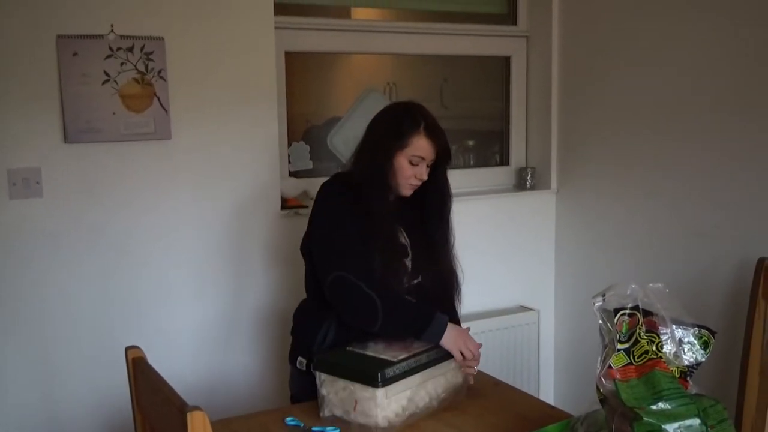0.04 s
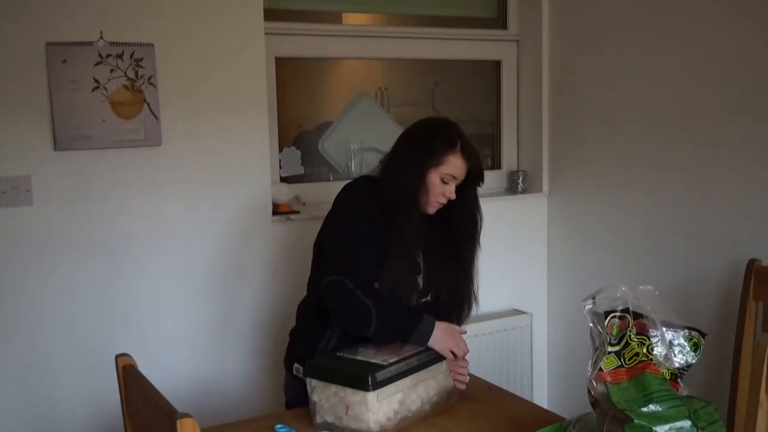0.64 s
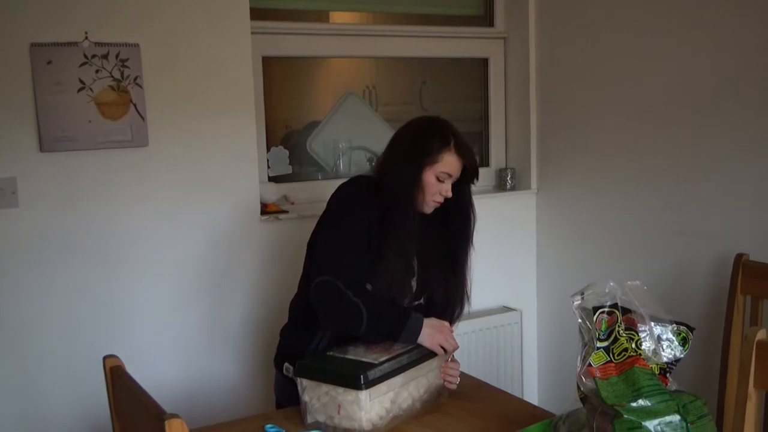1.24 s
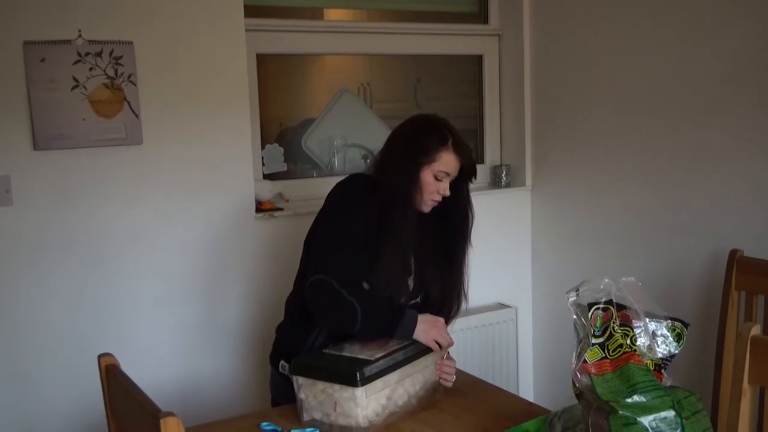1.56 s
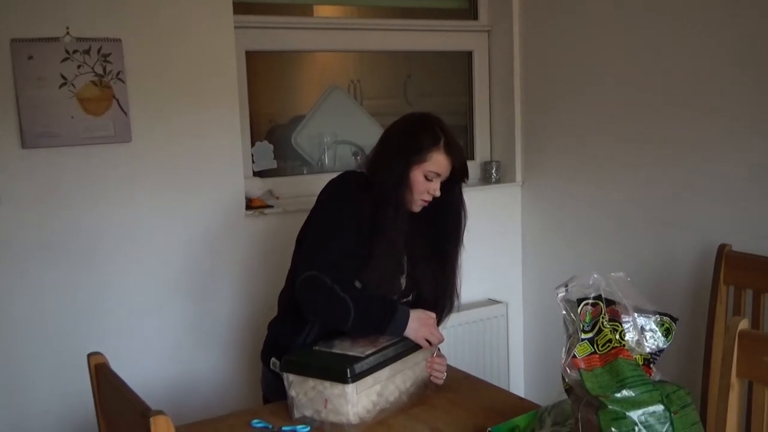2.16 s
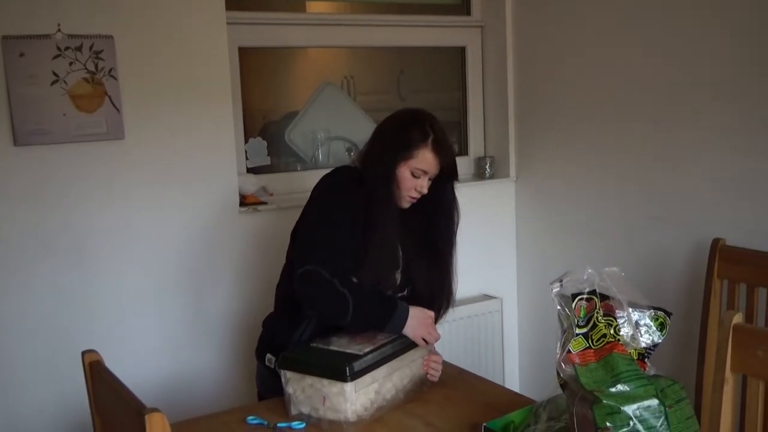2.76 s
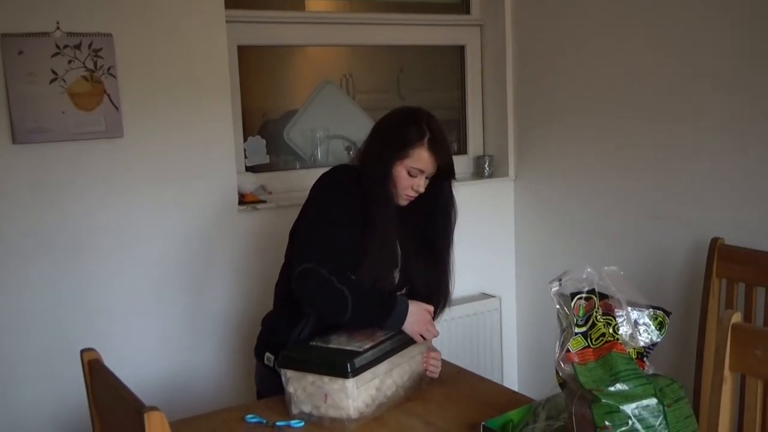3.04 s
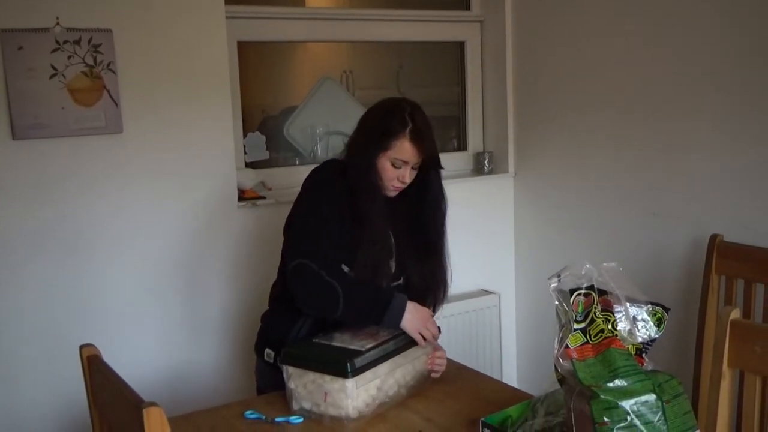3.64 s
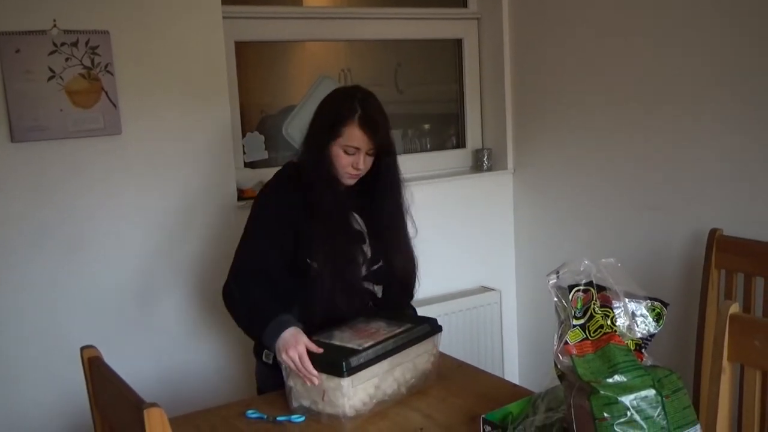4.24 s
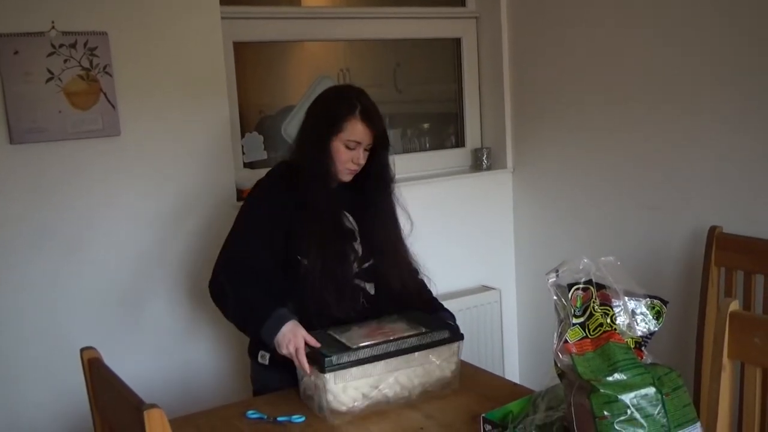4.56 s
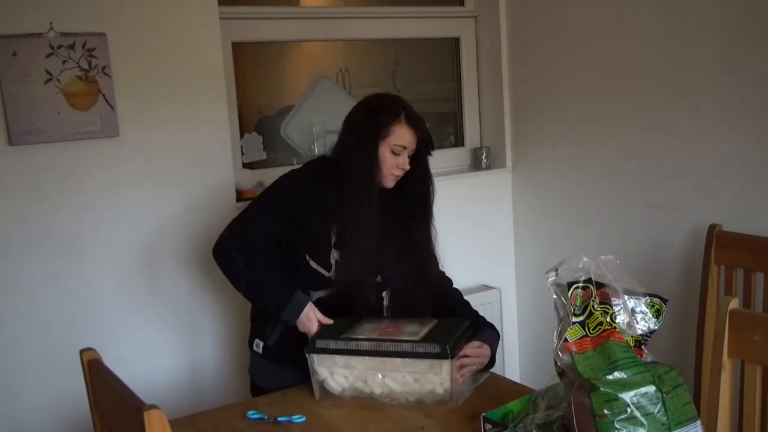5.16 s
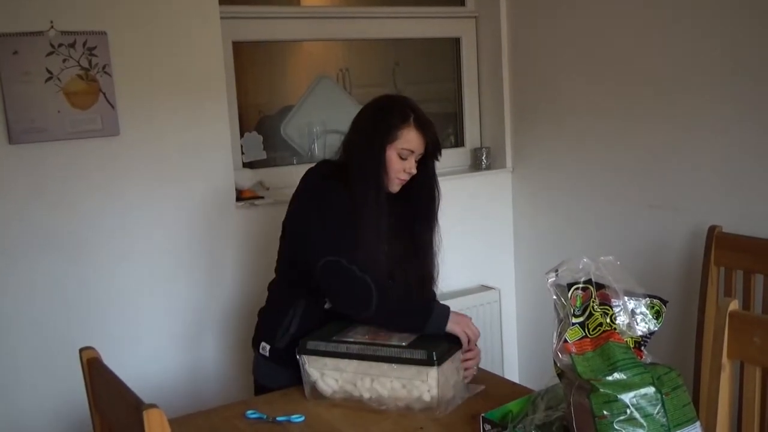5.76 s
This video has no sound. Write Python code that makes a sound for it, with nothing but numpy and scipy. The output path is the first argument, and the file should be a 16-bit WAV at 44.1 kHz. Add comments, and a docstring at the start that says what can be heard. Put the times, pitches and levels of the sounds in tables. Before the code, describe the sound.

In a small, quiet room, hands press on the lid of a plastic box filled with foam packing peanuts. The lid slips with light, sharp ticks and creaks, and the box bumps softly on a wooden table. It is then dragged round, scraping and juddering while the peanuts rustle inside. A few more ticks lead to a loud snap as the lid shuts. The walls add a brief echo, over a low hush and a faint whirr.

```python
"""A clear plastic box full of foam packing peanuts is handled on a wooden table in a small dining room.
Hands press the lid down: it slips on the rim with ticks and creaks, and the box bumps the table.
The box is then dragged round: its plastic scrapes, its base judders and the peanuts rustle inside.
At last the catch slips and the lid snaps shut, ringing the lid and the hollow box.
The walls echo briefly. Behind it all are a tiny mechanism's faint whirr and the room's low hush."""
import sys
import numpy as np
from scipy import signal
from scipy.fft import rfft, irfft, next_fast_len
from scipy.io import wavfile

SR = 44100
rng = np.random.default_rng(int(sys.argv[2]) if len(sys.argv) > 2 else 0)


def materialize(psi):
    """Save the field psi as 16-bit PCM at rate SR to the path in sys.argv[1].

    A 1-D psi becomes a single channel; in a 2-D psi each row is a channel.
    """
    bounded = np.clip(np.atleast_2d(psi).T, -1, 1)
    quanta = np.round(bounded * 32767).astype(np.int16)
    wavfile.write(sys.argv[1], SR, quanta)


N = 256088

# the lid slipping on the rim: start_s, level_db, pitch_hz, echo_db (compared with the tick)
LID_SLIPS = [(0.0259, -11, 10200, 3), (0.07, -19, 8900, -5), (0.0735, -12.5, 8750, -3),
             (0.164, -26, 9600, -1), (0.3072, -18.5, 9900, 1), (0.517, -20, 9150, 8), (0.715, -34, 7000, 6),
             (0.909, -32, 1190, -13), (1.086, -32.5, 9100, -1), (1.255, -26, 8800, 2.5),
             (1.5859, -25, 9150, 3), (1.7882, -23.5, 9900, 4), (1.818, -33.5, 5700, -6),
             (1.845, -37, 1290, 0.5), (1.9418, -40, 5000, 5), (2.102, -30, 5370, 2), (2.354, -25, 8600, -7),
             (2.554, -30, 9700, 1), (2.795, -40.5, 2430, 2.5), (3.362, -27.5, 7500, 2),
             (3.3703, -33.5, 10300, 12), (3.425, -27.5, 8750, -4), (3.456, -16.5, 9800, 1),
             (3.456, -27, 1340, -1), (3.4932, -15.5, 8100, 2.5), (3.9283, -23, 4530, -1),
             (4.1272, -12.5, 9800, -13), (4.214, -30, 4330, 7), (4.3915, -18.5, 3250, -1),
             (5.163, -15, 9800, -6), (5.306, -18, 5440, 3.5), (5.508, -25, 1460, 2),
             (5.554, -16, 7800, 8.5), (5.58, -14.5, 9000, -4)]
# the catch slips, then the lid slams home: start_s, click_db, lid_hit_db
SNAP_HITS = [(5.7391, -5.5, -45), (5.7395, -19, -24), (5.7412, -1, -31), (5.7426, -6.5, -18.5)]
# notes of the stiff lid: pitch_hz, level_db, ring_s (time to fade by 60 dB)
LID_NOTES = [(772, 0.5, 0.18), (1057, 1.5, 0.026), (1225, 0.5, 0.074), (1317, -4, 0.15), (1520, -30, 0.067),
             (1660, 11, 0.019), (1828, 4.5, 0.13), (1850, -2, 0.035), (2130, 3, 0.066), (2468, 5.5, 0.097),
             (2550, -2, 0.081), (2820, -7.5, 0.053), (3335, 7.5, 0.045), (7590, -2, 0.076),
             (8290, -16, .06), (9200, -16, .08), (9340, -4, 0.15)]
# pushes that shift the box: full_force_s, hold_s, rustle_db, scrape_db
BOX_PUSHES = [(0.0, 0.045, -33, -33), (0.245, .015, -48.5, -46.5), (0.314, 0.05, -71, -44.5),
              (0.57, 0.035, -51, -48), (0.715, 0.054, -57.5, -51.5), (0.96, 0.03, -61, -66),
              (1.09, 0.11, -70, -55.5), (1.38, 0.021, -67, -55.5), (2.36, 0.0088, -52, -41.5),
              (2.79, 0.097, -63.5, -64), (3.245, 0.0069, -55, -50.5), (3.383, .17, -48.5, -47.5),
              (3.844, 0.14, -50, -57.5), (3.96, 0.058, -43.5, -46), (4.08, 0.16, -46, -52.5),
              (4.225, 0.11, -45.5, -44), (4.345, 0.051, -37, -58), (5.502, 0.026, -35, -42.5),
              (5.583, 0.01, -39.5, -37), (5.713, 0.09, -35, -43)]
# drags across the table: full_speed_s, hold_s, rustle_db, scrape_db, judder_db
BOX_DRAGS = [(4.391, 0.14, -40.5, -39.5, -35), (4.925, 0.21, -35.5, -37.5, -38.5)]
# tone of peanuts rubbing together: pitch_hz, level_db
RUSTLE_TONE = [(2000, -14), (4000, -9.5), (6300, -10), (8000, -6.5), (9600, -3.5), (11500, -11),
               (13500, -20), (16000, -32)]
# tone of single peanuts slipping on the box wall: pitch_hz, level_db
CRACKLE_TONE = [(3000, -28), (7000, -11), (9500, -2), (12000, -1), (13500, -14), (16000, -30)]
# tone of scraping plastic: pitch_hz, level_db
SCRAPE_TONE = [(50, -5), (110, -15.5), (180, -8), (280, 4), (420, -5), (700, 1), (860, -2), (1100, -0.5),
               (1700, -2.5), (2500, -5), (4500, -8.5), (7000, -11.5), (14000, -25.5)]
# tone of the base juddering on the table: pitch_hz, level_db
JUDDER_TONE = [(40, -36), (80, -20.5), (130, -18.5), (175, -8.5), (225, -10), (268, 3.5), (325, -1),
               (370, -12.5), (530, -5.5), (750, -20), (1200, -28), (3000, -61)]
# the box bumping the table: start_s, box_hit_db, table_hit_db, top_hz (lower is softer)
TABLE_BUMPS = [(2.102, -45, -77, 400), (2.3634, -17.5, -52, 795), (3.2653, -25.5, -58.5, 587),
               (4.208, -19, -45, 657), (4.264, -25, -57, 400), (4.447, -41, -77, 606),
               (5.199, -25, -46.5, 350)]
# notes of the hollow box: pitch_hz, level_db, ring_s
BOX_NOTES = [(261.6, -4.5, 0.19), (324, -8.5, 0.08), (323, -7, 0.13), (364, -3, 0.036), (405, -11.5, 0.14),
             (428, -10.5, 0.14), (486, -25, 0.49), (535, -12, 0.2), (568, -15, 0.051), (637, -17.5, 0.14),
             (727, -9.5, 0.075), (736, -15, 0.045), (972, -14, 0.06), (1120, -15, 0.07)]
# notes of the table top: pitch_hz, level_db, ring_s
TABLE_NOTES = [(67.7, -2, 0.25), (86.5, -18, 0.16), (117, 5.5, 0.086), (177, 4.5, 0.27)]
# echo off the walls: pitch_hz, ring_s, level_db
ROOM_ECHO = [(100, 0.27, 9), (278, 0.43, 3), (577, 0.31, 5.5), (1480, 0.75, 4), (3770, 0.49, 2),
             (8950, 0.28, -5), (15000, 0.11, -8.5)]
# tone of the quiet room: pitch_hz, level_db
HUSH_TONE = [(25, 6.5), (40, -1), (60, 7.5), (80, -2), (100, 4), (125, -3), (170, 0.5), (260, -4.5),
             (440, -8), (700, -6), (1400, -17), (2500, -19.5), (5000, -32), (10000, -23), (15000, -29.5)]
# stereo width given to the rustle, scrape, judder, echo and hush; the highest treble is almost mono:
# pitch_hz, side_db (compared with the middle)
STEREO_WIDTH = [(60, -28), (250, -22), (500, -13), (1000, -9.5), (2500, -7), (5000, -7.5), (8000, -9),
                (12000, -33)]


def lid_ticks(lid_db=-50, creak_at_1khz_s=0.0085):
    """Each slip of the lid ticks and faintly rings it; low slips creak for longer."""
    direct, to_room, hits = np.zeros((3, N))
    for start_s, db, hz, echo_db in LID_SLIPS + faint_slips():
        creak_s = creak_at_1khz_s / (hz / 1000) ** 0.57
        tick = from_db(db) * click(hz, creak_s)
        add(direct, start_s, tick)
        # chatter evens out over all directions, so the room gets a smooth click of equal energy
        smooth = tick.std() * rms_one(click(hz, creak_s, chatter=0))
        add(to_room, start_s, from_db(echo_db) * smooth)
        add(hits, start_s, from_db(db + lid_db) * impulse())
    return direct + room(to_room + ring(hits, LID_NOTES))


def faint_slips(per_s=6, press_s=3.05, db=-40.5, spread_db=2, low_hz=1290, high_hz=5900, echo_db=-2):
    """Small random slips while the hands press, as rows like those of LID_SLIPS."""
    draws = rng.random((int(per_s * press_s), 3))
    return [(when * press_s, db + spread_db * (2 * size - 1), low_hz * (high_hz / low_hz) ** pitch, echo_db)
            for when, size, pitch in draws]


def click(hz, creak_s, damping=0.22, least_width_hz=900, broad_db=-18, chatter=0.12):
    """Hard plastic slips once, then chatters as it settles; the peak is near 1."""
    def plastic(force):
        """The plastic gives a bright peak and a weaker, lower one."""
        bright = resonance(force, hz, damping * hz + least_width_hz)
        broad = from_db(broad_db) * resonance(force, 0.27 * hz, hz)
        return keep_band(bright + broad, 4, 12500, "low")

    slip = impulse(size=4096)
    fade = np.exp(-np.arange(len(slip)) / (creak_s * SR))
    creak = chatter * rng.standard_normal(len(slip)) * fade
    return plastic(slip + creak) / np.abs(plastic(impulse())).max()


def lid_snap(catch_hz=8700, box_db=-13, ring_db=-8, crack_db=-9, echo_db=-3):
    """The catch lets go in a burst of clicks; the lid cracks, rings and shakes the box."""
    clicks, hits, crack = np.zeros((3, N))
    for start_s, click_db, hit_db in SNAP_HITS:
        catch = click(catch_hz, creak_s=0.0028, damping=0.066, broad_db=-33, chatter=0.053)
        add(clicks, start_s, from_db(click_db) * catch)
        add(hits, start_s, from_db(hit_db) * impulse())
        add(crack, start_s, from_db(hit_db + crack_db) * buckle(low_hz=690, high_hz=3350, decay_s=0.036))
    lid = from_db(ring_db) * ring(hits, LID_NOTES) + crack
    box = from_db(box_db) * ring(hits, BOX_NOTES)
    return clicks + lid + room(from_db(echo_db) * (clicks + lid) + box)


def buckle(low_hz, high_hz, decay_s):
    """Thin plastic flexes and its many close notes fade together, like a burst of noise."""
    t = np.arange(SR // 3) / SR
    noise = keep_band(rng.standard_normal(len(t)), 4, [low_hz, high_hz], "band")
    return rms_one(noise) * np.exp(-t / decay_s)


def sliding_box(crackle_db=-19):
    """As the box moves, peanuts rustle, plastic scrapes and the base judders on the table."""
    rustle, scrape, judder = movement()
    foam = rubbing(RUSTLE_TONE, per_s=5000, spread_db=3.0, uneven_db=1.5, echo_db=-3.5)
    # now and then one peanut slips against the wall with a fine, high tick
    crackle = rms_one(colour(grains(per_s=27, spread_db=1)[0], CRACKLE_TONE))
    plastic = rubbing(SCRAPE_TONE, per_s=5000, spread_db=3.0, uneven_db=1.58, echo_db=-7.5)
    base = rubbing(JUDDER_TONE, per_s=670, spread_db=-1.5, uneven_db=1.0, echo_db=-9.0)
    return rustle * (foam + from_db(crackle_db) * crackle) + scrape * plastic + judder * base


def movement(peanut_lag_s=0.082, judder_lag_s=0.046, judder_power=3.16, unstick_db=4, unstick_s=0.098):
    """How strong the rustle, scrape and judder are over time, from resting hands, pushes and drags."""
    rustle, scrape, judder = [np.full(N, from_db(-72))], [np.full(N, from_db(-69.5))], []  # resting hands
    for at_s, hold_s, rustle_db, scrape_db in BOX_PUSHES:
        push_db = swell(at_s, hold_s, rise_db_per_s=456, fall_db_per_s=131)
        # the load goes on shifting after each push
        settle_db = swell(at_s, hold_s, rise_db_per_s=456, fall_db_per_s=40) - 7
        force_db = np.maximum(push_db, settle_db)
        rustle.append(from_db(rustle_db + force_db))
        scrape.append(from_db(scrape_db + force_db))
    stop_db = swell(0, hold_s=5.42, rise_db_per_s=0, fall_db_per_s=131)  # the dragging ends
    for at_s, hold_s, rustle_db, scrape_db, judder_db in BOX_DRAGS:
        # the loose peanuts follow late, and the judder takes time to build
        box_db, load_db, base_db = (stop_db + swell(at_s + lag, hold_s, rise_db_per_s=140, fall_db_per_s=17)
                                    for lag in (0, peanut_lag_s, judder_lag_s))
        # extra scrape as the base comes unstuck
        extra_db = unstick_db * np.exp(-np.abs(np.arange(N) / SR - at_s) / unstick_s)
        rustle.append(from_db(rustle_db + load_db))
        scrape.append(from_db(scrape_db + box_db + extra_db))
        judder.append(from_db(judder_db + judder_power * base_db))  # grows steeply with speed
    return [np.linalg.norm(parts, axis=0) for parts in (rustle, scrape, judder)]  # their powers add


def rubbing(tone, per_s, spread_db, uneven_db, echo_db):
    """Surfaces stick and slip in uneven spurts, heard directly and off the walls."""
    contacts = grains(per_s, spread_db) * from_db(uneven_db * drift(per_s=45))
    near = widen(colour(contacts, tone))
    return rms_one(near + from_db(echo_db) * room(near[0]))


def grains(per_s, spread_db):
    """Two random streams of tiny contacts of uneven size."""
    sizes = from_db(spread_db * np.minimum(rng.exponential(1, (2, N)), 4))
    signs = rng.choice([-1, 1], (2, N))
    touches = rng.random((2, N)) < per_s / SR
    return rms_one(sizes * signs * touches)


def box_bumps(box_db=-3, flex_db=-20, bass_cut_hz=200, echo_db=-5):
    """Soft bumps ring the low notes of box and table and flex the box's sides."""
    on_box, on_table, sides = np.zeros((3, N))
    for start_s, box_hit_db, table_hit_db, top_hz in TABLE_BUMPS:
        soft_hit = keep_band(impulse(), 2, top_hz, "low")
        add(on_box, start_s, from_db(box_hit_db) * soft_hit)
        add(on_table, start_s, from_db(table_hit_db) * soft_hit)
        add(sides, start_s, from_db(box_hit_db + flex_db) * buckle(low_hz=302, high_hz=733, decay_s=0.029))
    box = keep_band(ring(on_box, BOX_NOTES), 2, bass_cut_hz, "high")  # a small box gives off little bass
    thuds = from_db(box_db) * box + sides + ring(on_table, TABLE_NOTES)
    return thuds + from_db(echo_db) * room(thuds)


def faint_whirr(step_s=0.04):
    """A tiny mechanism chirps in steps; every second step adds a higher note."""
    low = pips(step_s, first_s=0.0075, hz=2430, glide_hz_per_s=-22000, length_s=0.0045, db=-63)
    high = pips(2 * step_s, first_s=0.0425, hz=3000, glide_hz_per_s=90000, length_s=0.0028, db=-61)
    return low + high


def pips(period_s, first_s, hz, glide_hz_per_s, length_s, db):
    """A steady train of tiny, rough pips, each sliding in pitch."""
    from_pip_s = (np.arange(N) / SR - first_s + period_s / 2) % period_s - period_s / 2
    pitch_hz = hz + glide_hz_per_s * from_pip_s + 70 * drift(per_s=600)
    tone = np.sin(2 * np.pi * np.cumsum(pitch_hz) / SR)
    return from_db(db + drift(per_s=25)) * np.exp(-(from_pip_s / length_s) ** 2) * tone


def room(x, gap_s=0.00075, build_s=0.0021):
    """Echoes off bare walls build up quickly and die soonest in the treble."""
    t, hz = np.arange(SR) / SR, np.fft.rfftfreq(SR, 1 / SR)
    white, tail = rfft(rng.standard_normal((2, SR))), 0
    centres_hz = np.geomspace(60, 16000, 14)
    build = np.clip((t - gap_s) / build_s, 0, 1)
    for share, centre in zip(np.eye(len(centres_hz)), centres_hz):
        band = irfft(white * np.interp(hz, centres_hz, share), SR)
        fade = np.exp(-np.log(1000) * t / at_hz(ROOM_ECHO, centre)) * build
        gain = from_db(at_hz(ROOM_ECHO, centre, column=2))
        tail = tail + gain * band * fade / np.linalg.norm(fade)
    return signal.fftconvolve(x[None], widen(tail), axes=1)[:, :N]


def room_hush(level_db=-57):
    """The quiet room: a low, steady noise."""
    noise = colour(rng.standard_normal((2, N)), HUSH_TONE)
    return from_db(level_db) * rms_one(widen(noise))


def widen(pair):
    """Make stereo from two unrelated signals: one is the middle, the other adds width."""
    return pair[0] + colour(pair[1], STEREO_WIDTH) * np.array([[1], [-1]])


def ring(force, notes):
    """A hit sets each of an object's own notes ringing and fading."""
    total = np.zeros(N)
    for k, (hz, db, ring_s) in enumerate(notes):
        decay, turn = np.exp(-np.log(1000) / (ring_s * SR)), 2 * np.pi * hz / SR
        note = signal.lfilter([0, np.sin(turn)], [1, -2 * decay * np.cos(turn), decay ** 2], force + 1e-18)
        total += (-1) ** k * from_db(db) * note
    return total


def resonance(x, hz, width_hz):
    """Let one pitch through at full strength and weaken those around it."""
    decay = np.exp(-np.pi * width_hz / SR)
    feedback = [1, -2 * decay * np.cos(2 * np.pi * hz / SR), decay ** 2]
    return signal.lfilter(np.array([1, 0, -1]) * (1 - decay ** 2) / 2, feedback, x + 1e-18)


def keep_band(x, order, hz, kind):
    """Keep the lows, the highs or a band between; a higher order cuts more sharply."""
    return signal.sosfilt(signal.butter(order, hz, kind, fs=SR, output="sos"), x)


def colour(x, tone):
    """Shape a sound's bass and treble to follow a tone table."""
    size = next_fast_len(x.shape[-1])
    gains = from_db(at_hz(tone, np.fft.rfftfreq(size, 1 / SR)))
    return irfft(rfft(x, size) * gains, size)[..., :x.shape[-1]]


def at_hz(rows, hz, column=1):
    """Read a table at any pitch, blending between its rows."""
    table = np.array(rows)
    return np.interp(np.log(np.maximum(hz, 1)), np.log(table[:, 0]), table[:, column])


def swell(full_s, hold_s, rise_db_per_s, fall_db_per_s):
    """A level that rises to 0 dB, holds and falls."""
    t = np.arange(N) / SR - full_s
    return np.minimum(t, 0) * rise_db_per_s - np.maximum(t - hold_s, 0) * fall_db_per_s


def drift(per_s):
    """A random wander of typical size 1."""
    points = rng.standard_normal(4096)
    return rms_one(np.interp(np.arange(N) / SR * per_s, np.arange(len(points)), points))


def add(track, start_s, sound):
    """Mix a short sound in at a given time."""
    at = int(round(start_s * SR))
    track[at:at + len(sound)] += sound[:N - at]


def impulse(size=1024):
    """One sharp tap of height 1."""
    return signal.unit_impulse(size)


def from_db(db):
    """Turn decibels into a multiplier."""
    return 10 ** (np.asarray(db) / 20)


def rms_one(x):
    """Scale to an average (rms) level of 1."""
    return x / np.sqrt(np.mean(x ** 2) + 1e-20)


def scene():
    """The box being handled, over a faint whirr and the hush of the room."""
    hush = room_hush()
    return lid_ticks() + box_bumps() + lid_snap() + sliding_box() + faint_whirr() + hush


def record(dry, low_cut_hz=48, high_cut_hz=17100):
    """Cut the deepest bass, round off the loudest peaks and cut the highest treble."""
    rounded = np.tanh(keep_band(dry, 4, low_cut_hz, "high"))
    return signal.sosfilt(signal.cheby2(12, 70, high_cut_hz, fs=SR, output="sos"), rounded)


dry = scene()
out = record(dry)
materialize(out)
```